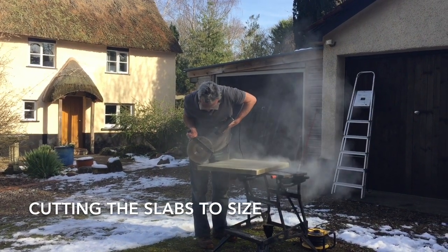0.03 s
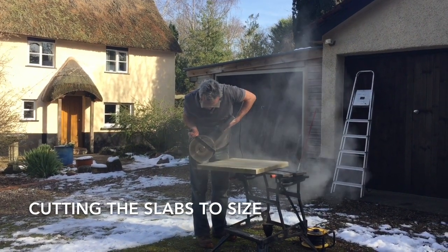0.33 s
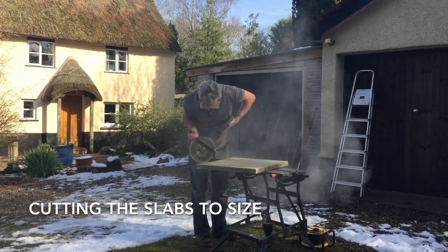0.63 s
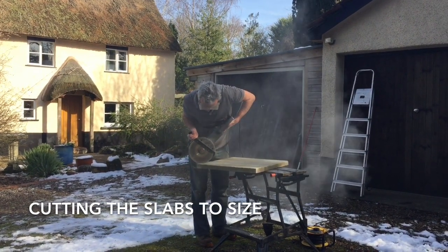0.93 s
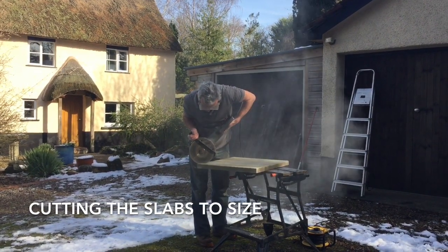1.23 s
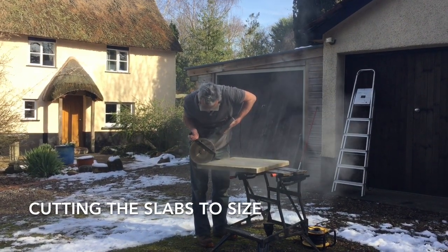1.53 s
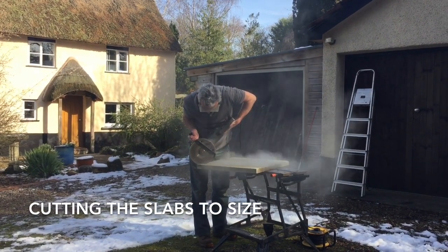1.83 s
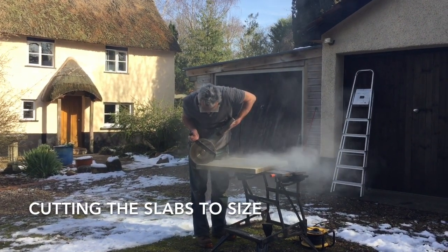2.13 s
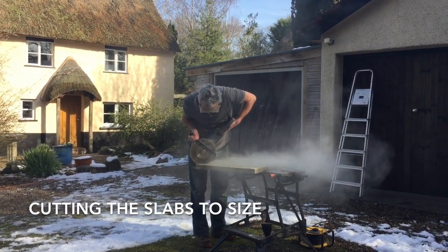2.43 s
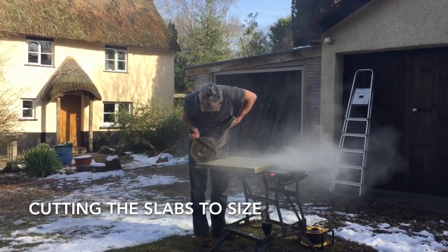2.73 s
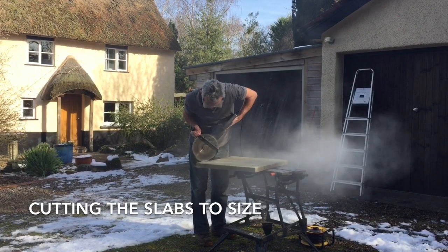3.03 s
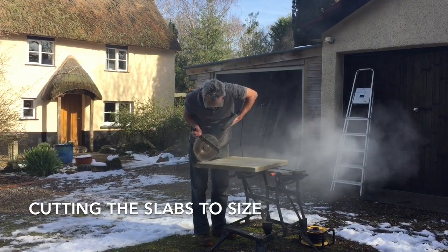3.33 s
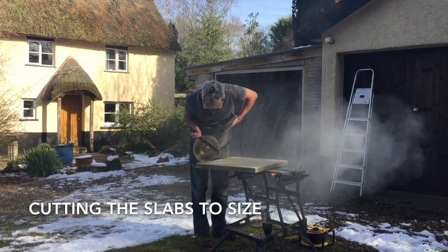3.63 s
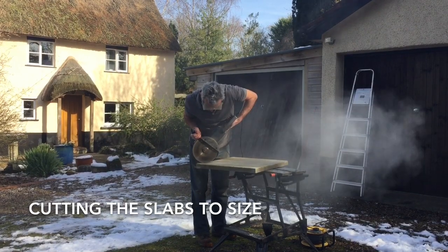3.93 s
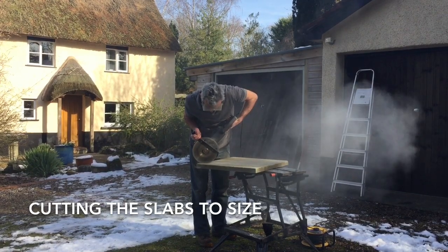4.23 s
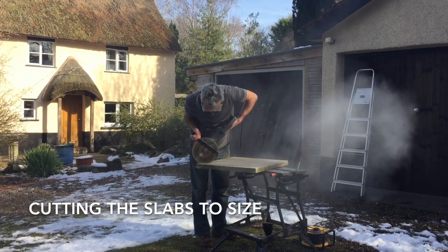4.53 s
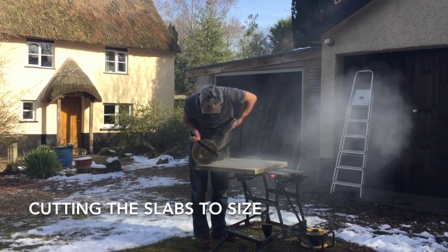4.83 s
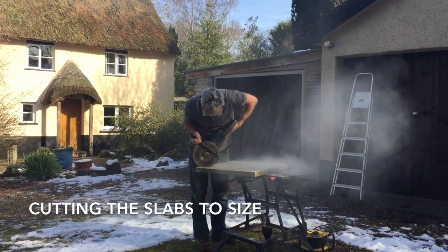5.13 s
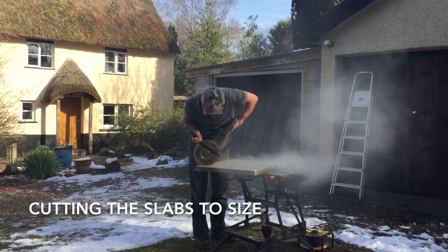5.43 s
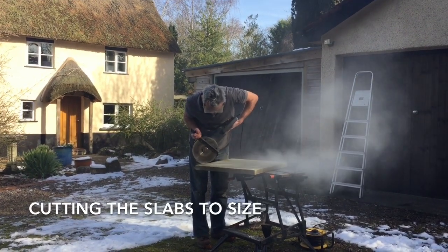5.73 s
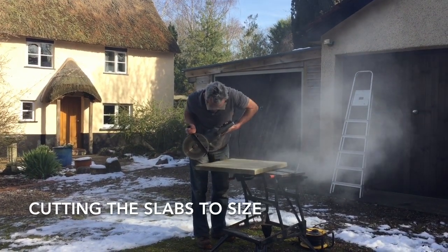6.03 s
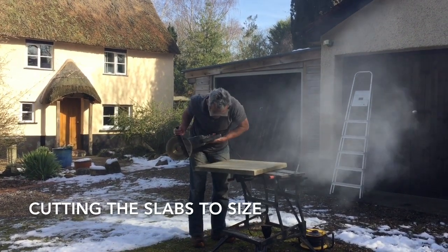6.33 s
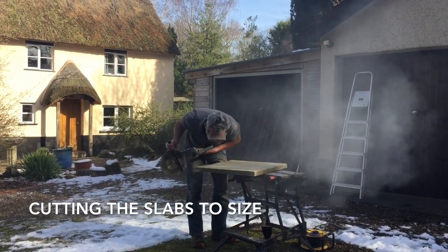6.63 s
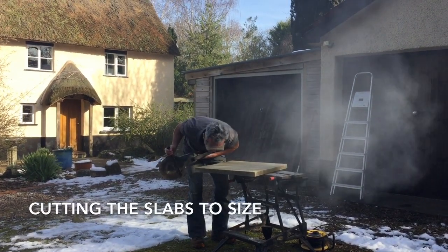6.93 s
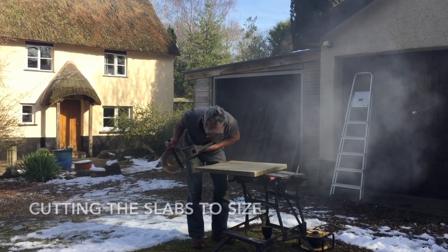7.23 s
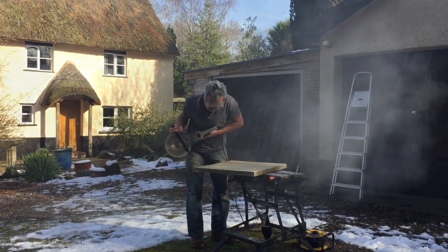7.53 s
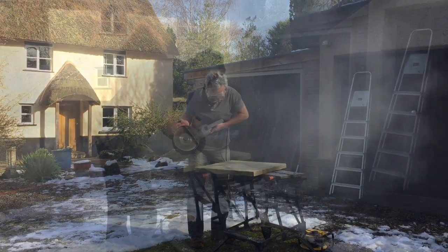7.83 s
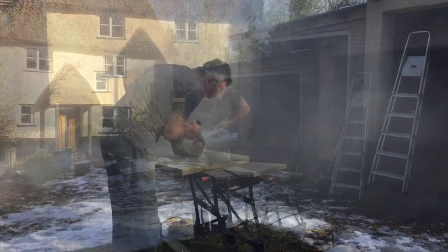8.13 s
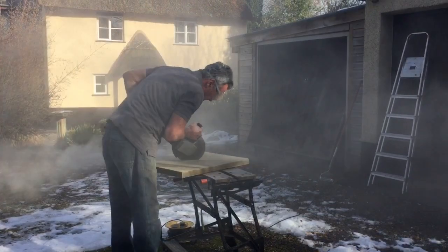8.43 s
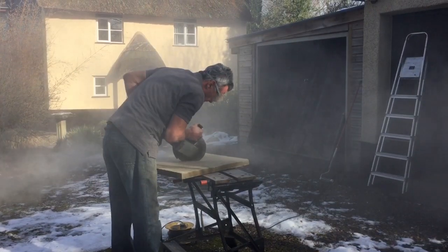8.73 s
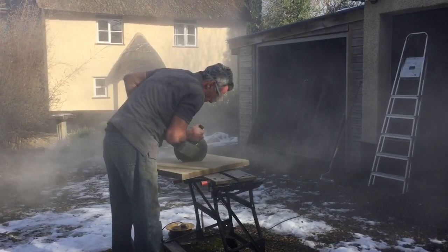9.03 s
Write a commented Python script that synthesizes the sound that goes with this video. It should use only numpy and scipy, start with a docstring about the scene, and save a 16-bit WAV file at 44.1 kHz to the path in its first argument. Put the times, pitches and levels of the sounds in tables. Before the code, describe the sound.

An electric disc cutter is already running, its thin whine rising within a wide rush of air. From about 1 second the disc lightly grazes a stone slab with brief ringing touches. At 1.4 seconds it bites into a bright, gritty, metallic screech, and the motor pitch sags. It lifts at 2.8 seconds, the steel disc ringing briefly as the whine climbs again. A second screeching pass runs from 4.3 to 5.7 seconds, again slowing the motor and ending in a short ring. The tool then spins free, with a breathy whistle swelling from about 6.5 seconds and the airy tone shifting as it swings aside. Between 7.5 and 8.5 seconds this dissolves into a slower, deeper cut, a steady grinding with a droning tone that lasts to the end at about 9 seconds. Everything is heard in mono, outdoors, with short echoes from nearby walls.

```python
"""A rush of air and a rising whine: an electric disc cutter winds up in a yard. It grazes a stone slab,
scores it twice and runs free as it is swung aside; the sound dissolves into a slower, deeper cut.
Motor speed drives the fan and gear lines, the whistle of the rim and its once-a-turn knock; grit rings
the steel disc while it bites. House and garage walls echo it all into one microphone."""
import sys
import numpy as np
from scipy import signal
from scipy.fft import rfft, irfft
from scipy.io import wavfile

SR = 44100
rng = np.random.default_rng(int(sys.argv[2]) if len(sys.argv) > 2 else 0)


def master(y):
    """Save y as 16-bit WAV."""
    cut = np.clip(np.atleast_2d(y).T, -1, 1)
    pcm = np.round(cut * 32767)  # scale
    wavfile.write(sys.argv[1], SR, pcm.astype(np.int16))


N = 401310
TIME = np.arange(N) / SR
HZ = np.maximum(np.arange(N // 2 + 1) * SR / N, 1)
GEAR = 12 / 44  # disc turns per turn of the motor shaft
FREE_HZ, START_HZ, DEEP_HZ = 357.4, 307.0, 231.0  # shaft rate: unloaded, at the start, in the deep cut

# spectrum of crumbling stone: pitch_hz, level_db
GRIT = [(200, -62), (1500, -31), (2500, -41), (4500, -48), (6500, -23.5), (8500, -18.5), (10400, -26.5),
        (13000, -25), (15700, -25.5)]
# the disc leaves the stone and rings on: start_s, level_db
LIFTS = [(-.1, -32), (2.8, -27.5), (5.74, -30)]


def undb(db):
    """Decibels to gain."""
    return 10 ** (np.asarray(db) / 20)


def unit(x):
    """Scale to rms 1."""
    return x / np.sqrt(np.mean(x ** 2))


def curve(rows, column=1):
    """One column of a time table, joined by straight lines."""
    rows = np.array(rows, float)
    return np.interp(TIME, rows[:, 0], rows[:, column])


def bell(middle_s, length_s):
    """A smooth swell from 0 to 1 and back."""
    return np.cos(np.pi * np.clip((TIME - middle_s) / length_s, -.5, .5)) ** 2


def slope(points):
    """Power response through points of pitch_hz, level_db."""
    hz, db = np.transpose(points)
    return undb(np.interp(np.log(HZ), np.log(hz), db)) ** 2


def resonances(modes, skirt, column=2):
    """Power response of a set of modes; a higher skirt deepens the valleys between them."""
    return sum(undb(mode[column]) ** 2 * (1 + (2 * (HZ - mode[0]) / mode[1]) ** 2 / skirt) ** -skirt
               for mode in modes)


def noise(power):
    """Dense random excitation heard through a power response; rms 1."""
    return unit(irfft(rfft(rng.standard_normal(N)) * np.sqrt(power), N))


def walk(rate_hz):
    """Smooth random motion up to about the given rate; spread about 1."""
    step = TIME * 2 * rate_hz
    count = int(step[-1]) + 2
    return 1.12 * np.interp(step, np.arange(count), rng.standard_normal(count))


def turns(hz):
    """Angle of a shaft turning at the given rate."""
    return 2 * np.pi * np.cumsum(hz) / SR


def yard(direct, t60_s, wet_db):
    """Scattered echoes off walls and ground reach the microphone from 12 ms after the direct sound."""
    t = TIME[:SR // 2]
    echoes = rng.standard_normal(len(t)) * undb(-60 * t / t60_s) * (t > .012)
    return direct + undb(wet_db) * signal.fftconvolve(direct, echoes / np.linalg.norm(echoes))[:N]


def air(swing, rush, howl, buffet):
    """A wide rush, low buffeting and the howl of the guard, whose resonances change as the tool swings."""
    # spectrum of the rush: pitch_hz, level_db
    rush_colour = [(55, -29.5), (250, -10), (360, -9.5), (430, -14.5), (540, -4), (1500, 1.5), (3900, 0.5),
                   (4500, 4.5), (4950, -4.5), (5250, -2), (5600, -4.5), (6300, -7), (7200, -13),
                   (9000, -10), (10400, -17.5), (11500, -14.5), (13000, -17.5), (15700, -20.5)]
    # spectrum of the buffeting: pitch_hz, level_db
    buffet_colour = [(22, -40), (52, 1.5), (120, -6), (200, 4), (290, -4), (450, -32)]
    # air resonances of the guard: pitch_hz, width_hz, upright_db, aside_db
    guard_modes = [(626.7, 39, 0, -16), (740, 116, -42, -8.5), (947, 38, 5, 3), (1057, 89, 2.5, -32),
                   (5470, 530, -36, -13)]
    wide = noise(slope(rush_colour)) * undb(0.66 * walk(23))
    upright = noise(resonances(guard_modes, skirt=1.65))
    aside = noise(resonances(guard_modes, skirt=1.7, column=3))
    guard = (np.sqrt(1 - swing) * upright + np.sqrt(swing) * aside) * undb(1.1 * walk(5))
    return rush * wide + howl * guard + buffet * noise(slope(buffet_colour))


def shaft_speed(wind_up_s=.98):
    """The motor eases towards its free speed less the drag of the stone; Hz."""
    # leaning on the tool: start_s, build_up_s, end_s, drag_hz
    pushes = [(1.55, .2, 2.768, 78), (2.25, .2, 2.768, 15), (4.565, .5, 5.718, 69.4)]
    drag = sum(hz * np.clip((TIME - start) / build, 0, 1) * (TIME < end) for start, build, end, hz in pushes)
    step = 1 / (wind_up_s * SR)
    sag = signal.lfilter([step], [1, step - 1], drag)
    return FREE_HZ - (FREE_HZ - START_HZ) * np.exp(-TIME / wind_up_s) - sag


def motor(shaft, speed, flutter_db):
    """Thin lines tied to the shaft rate, louder with speed, their levels fluttering."""
    # commutator, gear mesh and fan blades: shaft_multiple, level_db
    orders = [(1, -51), (6, -47), (12, -43), (18, -45), (18.727, -51), (19, -40), (19.273, -51), (20, -53),
              (21, -57), (24, -49), (35, -62), (36, -54), (37, -49), (38, -44), (39, -48.5), (41, -62)]
    lines = sum(undb(db + flutter_db * walk(7.5)) * np.sin(k * shaft) for k, db in orders)
    return np.sqrt(2) * lines * speed ** 3


def eddy(angle, width_hz):
    """A narrow band of turbulence centred on a moving tone."""
    band = 1 / (1 + (2 * HZ / width_hz) ** 4)
    return noise(band) * np.cos(angle) + noise(band) * np.sin(angle)


def whistle(shaft, rush, grip):
    """The rim sheds eddies: a breathy whistle with two bands of hiss above it; the stone stifles them."""
    # the whistle flares as the rim turns through the air: middle_s, length_s, level_db
    flares = [(.4, .4, -35), (1.35, 1.0, -26.5), (3.353, 0.26, -33), (6.2, .45, -34), (6.58, 0.29, -22.5),
              (7.03, 1, -21), (7.388, 0.46, -18.5), (7.835, 0.45, -18)]
    disc = GEAR * shaft
    core = np.sqrt(2) * np.sin(46 * disc + .4 * walk(10)) * undb(.8 * walk(8))
    tone = undb(-1) * core + undb(-8) * eddy(46 * disc, width_hz=130)
    low_hiss = eddy(49.5 * disc, width_hz=260) * undb(-3.5 + walk(9))
    high_hiss = eddy(55.5 * disc, width_hz=380) * undb(-10)
    strength = undb(-36) + sum(undb(db) * bell(middle, length) for middle, length, db in flares)
    return (tone * strength + (low_hiss + high_hiss) * rush) / (1 + grip ** 2)


def ring_out(detune_hz=13.2, attack_s=0.015):
    """The freed disc rings down, beating gently as it spins."""
    # modes of the disc clear of the stone: pitch_hz, level_db, t60_s
    free_modes = [(1392, -4, 1.3), (1922, -5, 1.0), (3385, -3, 1.1), (3515, 3, .85), (3878, 0, 1.1),
                  (4240, -4, .7), (5440, -7, .35)]
    out = np.zeros(N)
    t = TIME[:SR]
    attack = np.minimum(t / attack_s, 1)
    for start, db in LIFTS:
        first = max(int(start * SR), 0)
        for hz, mode_db, t60 in free_modes:
            twin = np.sin(2 * np.pi * (hz + rng.normal(0, detune_hz)) * t + rng.uniform(0, 2 * np.pi))
            pair = np.sin(2 * np.pi * hz * t) + 0.53 * twin
            out[first:first + SR] += pair * undb(db + mode_db - 60 * t / t60) * attack
    return np.sqrt(2) * out


def knock(shaft, flutter_db, column):
    """Each turn of the disc repeats the same uneven contact: low lines that boom through the slab."""
    # the rim on the stone: disc_multiple, scoring_db, deep_cut_db
    orders = [(1, -66, -69), (2, -68, -68), (3, -53, -63), (4, -48, -53), (5, -55, -62), (6, -53, -49),
              (7, -50, -58), (8, -40, -49), (11, -35, -41), (12, -35, -51), (13, -40, -41), (14, -50, -38),
              (15, -49, -43), (16, -49, -54), (17, -54, -29), (20, -52, -49), (21, -52, -49),
              (24, -44, -51), (25, -45, -51)]
    # resonances of slab and bench: pitch_hz, width_hz, level_db
    slab_modes = [(752, 25, -3), (1008, 37, 11), (1400, 27, 16)]
    disc = GEAR * shaft + .04 * walk(10)
    lines = np.zeros(N)
    for order in orders:
        level = undb(order[column] + flutter_db * walk(4.3))
        lines += level * np.sin(order[0] * disc + rng.uniform(0, 2 * np.pi))
    boom = np.sqrt(1 + resonances(slab_modes, skirt=5.2))
    return np.sqrt(2) * irfft(rfft(lines) * boom, N)


def crumble(chatter_db, grain_db):
    """The bite wavers in the hands and breaks off grain by grain; gain."""
    return undb(chatter_db * walk(32) + grain_db * walk(900))


def contact(release_t60_s, column):
    """Every touch of disc on stone swells, holds and dies away; gain."""
    # three grazes, then two passes, each pressed harder early on:
    # start_s, attack_s, end_s, screech_db, singing_db
    touches = [(1.028, .015, 1.065, -35, -28.5), (1.18, 0.027, 1.43, -34, -25.5),
               (1.26, 0.018, 1.255, -29, -20), (1.38, 0.13, 2.813, -23.5, -19),
               (1.42, 0.24, 1.85, -42, -31), (4.285, 0.081, 5.745, -24.5, -20.5),
               (4.3, 0.12, 5.32, -43, -26.5)]
    gain = np.zeros(N)
    for touch in touches:
        start, attack, end = touch[:3]
        release_db = -60 * np.maximum(TIME - end, 0) / release_t60_s
        gain += np.clip((TIME - start) / attack, 0, 1) * undb(touch[column] + release_db)
    return gain


def steel_disc(column, flutter_db=.9, count=3):
    """Grit rings interleaved families of modes, which flare in turn as the contact point wanders."""
    # modes of the steel disc: pitch_hz, width_hz, first_pass_db, second_pass_db
    modes = [(2598, 72, -1.5, -4), (2790, 160, -12.5, -11), (3050, 31, -13, -9), (3500, 114, -2.5, 1),
             (3539, 63, 7, 12.5), (3820, 36, -1, -8), (3934, 21, -7, 5), (4280, 18, -3, 3.5),
             (4466, 11, 3, 5), (4606, 56, -1.5, -8), (5220, 48, 3, 1), (5480, 200, -4.5, -3.5),
             (5490, 35, 0.5, 5), (5940, 51, -11, -1.5), (5930, 68, -10, -21), (6285, 37, -1.5, -0.5),
             (6870, 99, -11, -11.5), (7420, 130, -12, -11), (7650, 82, -17, -14), (8250, 90, -14, -17),
             (8660, 77, -9, -6.5), (9200, 130, -25, -18), (9400, 45, -6.5, -9), (9760, 76, -12.5, -7.5),
             (10700, 90, -16, -19), (11100, 56, -10.5, -11.5), (11700, 130, -18, -17),
             (11660, 38, -20, -11), (12400, 60, -15, -18), (12900, 250, -24, -18), (13400, 60, -21, -22),
             (14200, 150, -23, -20)]
    powers = [resonances(modes[k::count], skirt=1.42, column=column) for k in range(count)]
    families = [np.sqrt(power.mean()) * noise(power) for power in powers]
    return sum(family * undb(flutter_db * walk(14)) for family in families)


def scoring_pass(bite, sing, column, singing_hz=3520, width_hz=500):
    """A light touch makes the loudest mode pair sing; a firm bite adds the rest and crumbling stone."""
    steel = steel_disc(column)
    singing = irfft(rfft(steel) / (1 + (2 * (HZ - singing_hz) / width_hz) ** 8), N)
    grit = np.sqrt(slope(GRIT).mean()) * noise(slope(GRIT))
    ring = unit(singing) * sing * undb(.9 * walk(5))
    screech = unit(steel - singing + grit) * bite * undb(9.5 + .5 * walk(5))
    return ring + screech * crumble(chatter_db=0.45, grain_db=0.9)


def deep_cut():
    """Sunk in its slot the disc runs slowly, rings with broader modes and drones on the stone."""
    # the disc gripped in its slot: pitch_hz, width_hz, level_db
    gripped_modes = [(900, 88, -2), (1578, 30, -8), (2580, 174, -2), (2940, 42, -4.5), (3360, 110, -3),
                     (3760, 100, -4.5), (4390, 84, -4), (5220, 170, -3.5), (5600, 140, -5.5), (5776, 92, 2),
                     (6210, 170, -9), (6780, 110, -10.5), (7280, 70, -11), (8650, 160, -10),
                     (9100, 130, -13), (11300, 50, -13), (11700, 60, -21), (11720, 80, -13),
                     (12700, 200, -17), (13900, 60, -11), (15640, 90, -13)]
    # drone and howl build as the disc sinks in: time_s, level_db
    sinking = [(7.9, -6), (8.8, 1)]
    depth = undb(curve(sinking))
    grinding = noise(resonances(gripped_modes, skirt=1.2) + undb(5) * slope(GRIT))
    grinding *= crumble(chatter_db=1.2, grain_db=0)
    drone = knock(turns(np.full(N, DEEP_HZ)), flutter_db=1.5, column=2)
    wind = air(swing=.8, rush=undb(-23.5), howl=depth * undb(-27), buffet=undb(-53))
    return undb(-15.5) * grinding + depth * drone + wind


def scoring(firm_bite_db=-21.5, second_pass_s=4):
    """Shaft speed, touch and pose drive the two passes and the free run."""
    # how the tool is held (swing 0 upright, 1 aside) and its air at free speed:
    # time_s, swing, rush_db, howl_db, buffet_db
    pose = [(0, 0.07, -18, -23.5, -50), (1.5, 0.07, -19.5, -25, -55), (2.7, 0.08, -19.5, -24.5, -66),
            (4.3, 0.02, -19.5, -23.5, -55), (5.3, 0.08, -21, -27, -49), (6.4, 0.04, -20.5, -26.5, -47.5),
            (6.9, 1, -20.5, -24, -46), (7.3, 0.98, -21, -23, -45), (7.6, .6, -21.5, -26, -49)]
    hz = shaft_speed()
    speed = hz / FREE_HZ
    shaft = turns(hz * (1 + .0002 * walk(8)))
    bite = contact(release_t60_s=0.16, column=3) * speed ** 1.3
    sing = contact(release_t60_s=0.48, column=4) * speed ** 3.5
    grip = bite / undb(firm_bite_db)
    # the air dips briefly after each lift
    dip_db = -3.5 * sum(bell(start + 0.11, length_s=0.37) for start, _ in LIFTS)
    flow = speed ** 3.3 * undb(dip_db)
    rush = flow * undb(curve(pose, column=2))
    howl = flow * undb(curve(pose, column=3) + 3 * grip)
    buffet = flow * undb(curve(pose, column=4) + 2 * grip)
    spin = undb(0.5) * motor(shaft, speed, flutter_db=2) + whistle(shaft, rush, grip)
    first, second = (scoring_pass(bite, sing, column) for column in (2, 3))
    stone = np.where(TIME < second_pass_s, first, second)
    knocks = bite * speed * undb(24) * knock(shaft, flutter_db=2, column=1)
    return air(curve(pose), rush, howl, buffet) + spin + stone + knocks + ring_out()


def scene():
    """Two passes and a free run dissolve into the deep cut; one microphone feeds both channels."""
    # the dissolve: start_s, end_s
    dissolve = (7.52, 8.55)
    fade = np.interp(TIME, dissolve, (0, 1))
    tool = (1 - fade) * scoring() + fade * deep_cut()
    return np.tile(yard(tool, t60_s=0.32, wet_db=-10.0), (2, 1))


def record(dry, bass_hz=38, drive=.65, top_hz=15750):
    """The recorder drops the deepest bass, rounds the highest peaks and cuts the top."""
    lean = signal.sosfilt(signal.butter(4, bass_hz, "highpass", fs=SR, output="sos"), dry)
    rounded = np.tanh(drive * lean) / drive
    return signal.sosfilt(signal.ellip(10, .2, 80, top_hz, fs=SR, output="sos"), rounded)


dry = scene()
out = record(dry)
master(out)
```